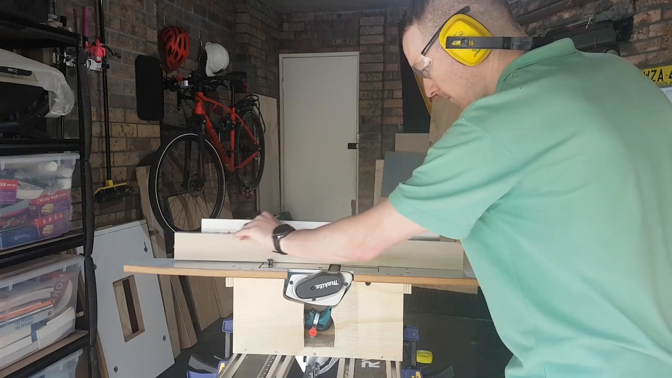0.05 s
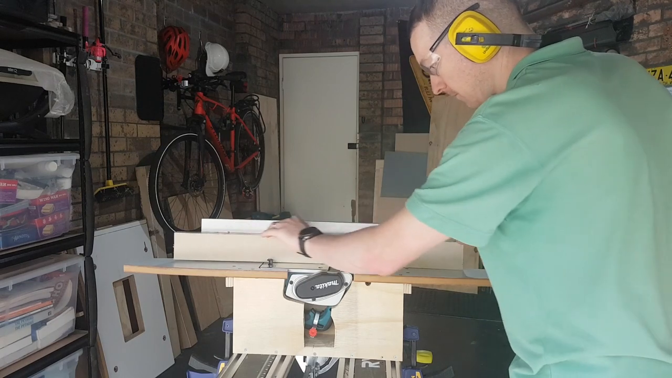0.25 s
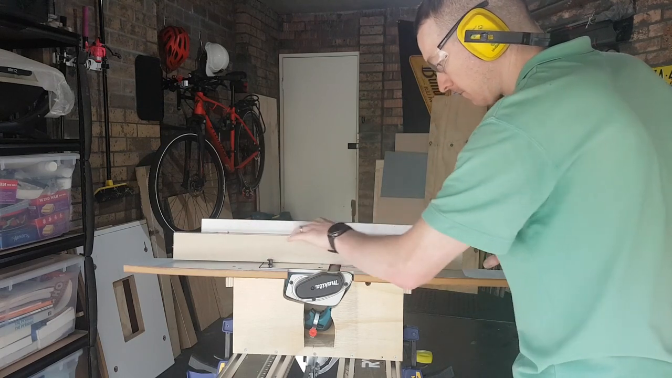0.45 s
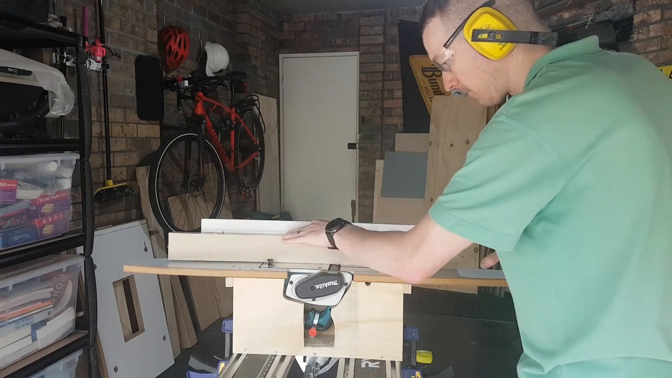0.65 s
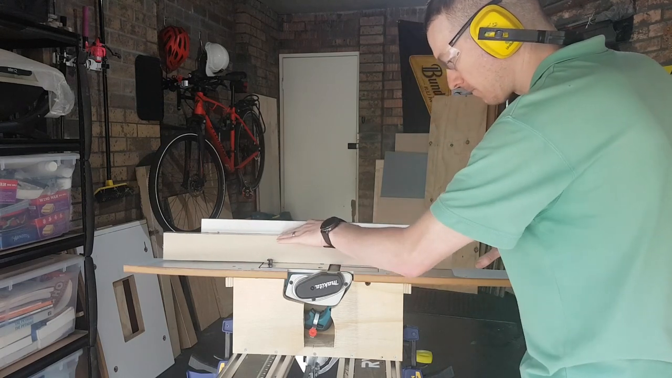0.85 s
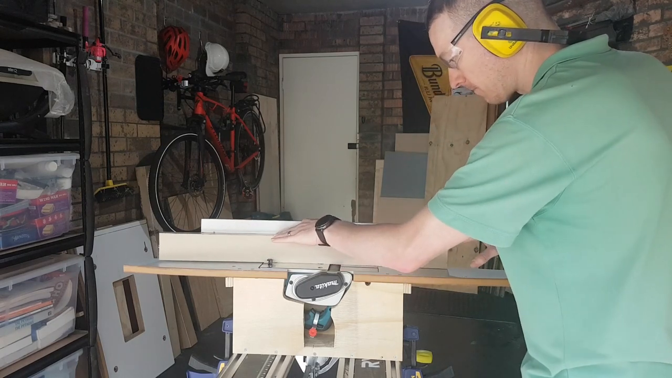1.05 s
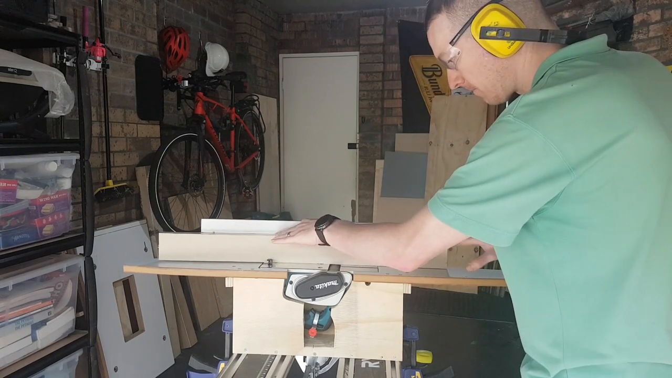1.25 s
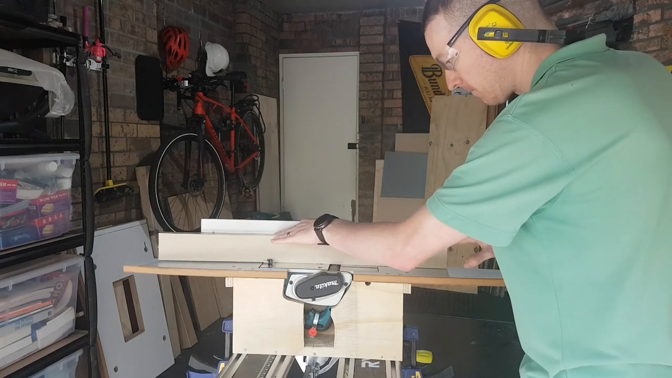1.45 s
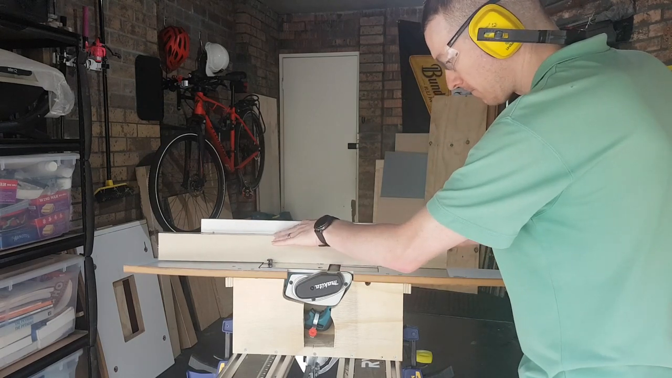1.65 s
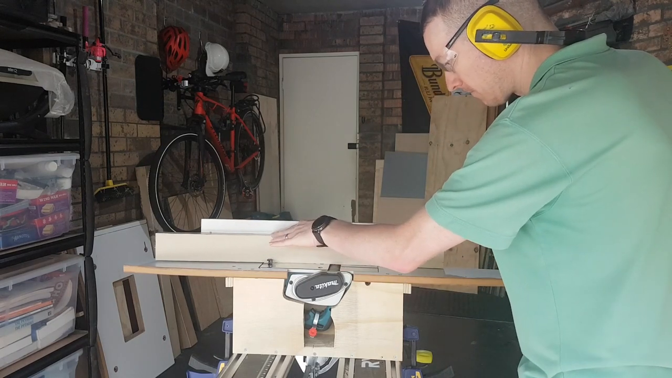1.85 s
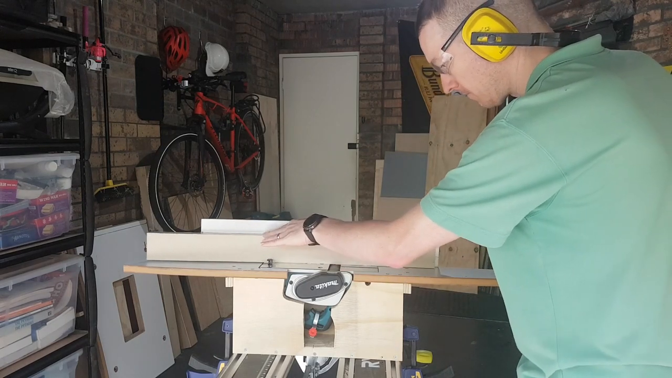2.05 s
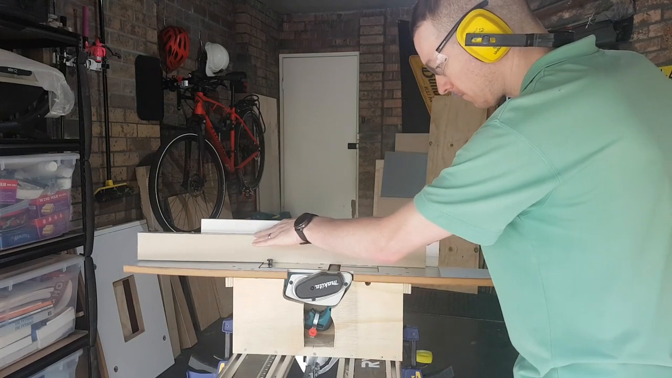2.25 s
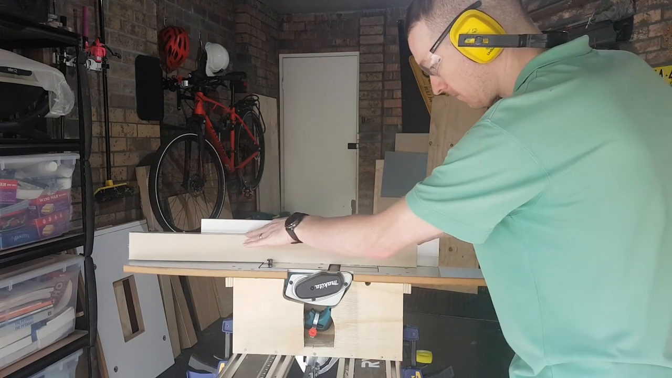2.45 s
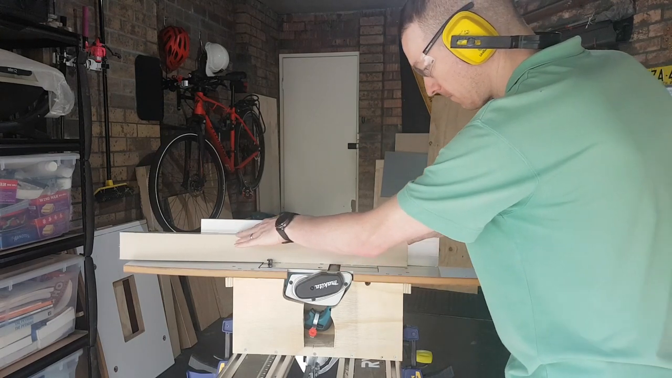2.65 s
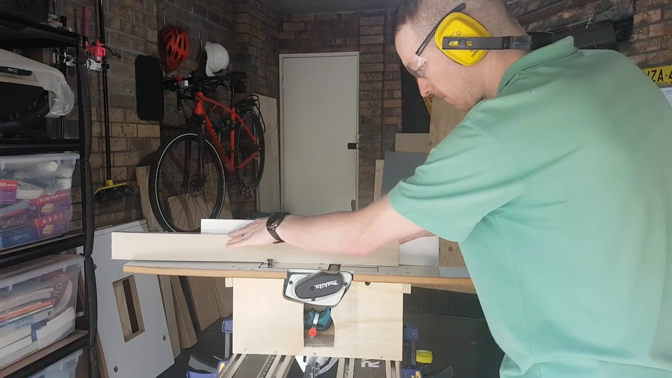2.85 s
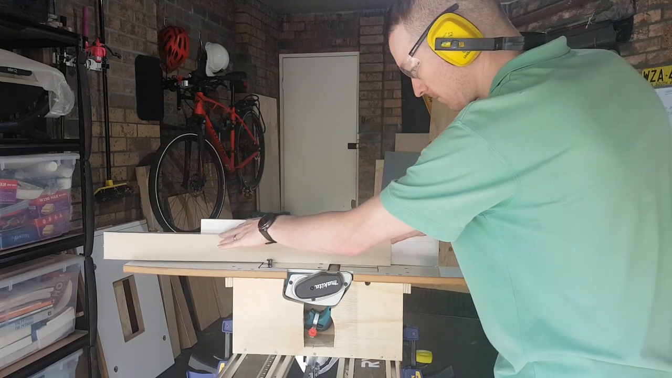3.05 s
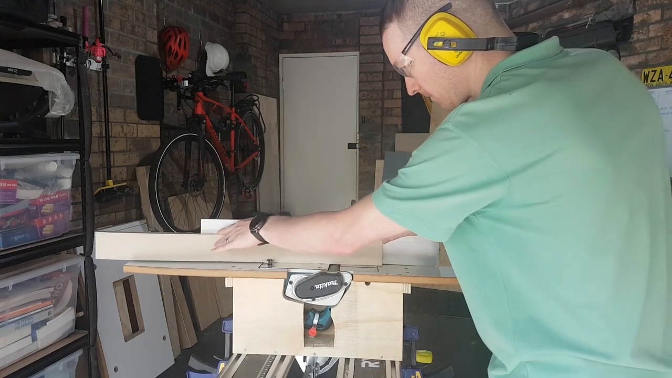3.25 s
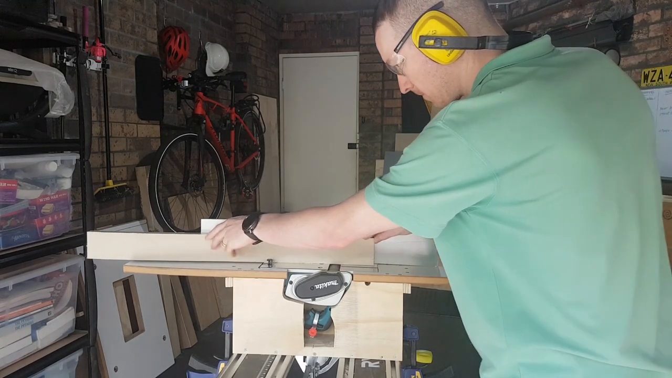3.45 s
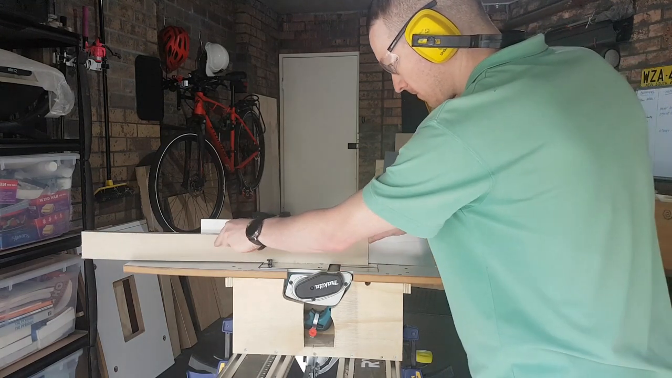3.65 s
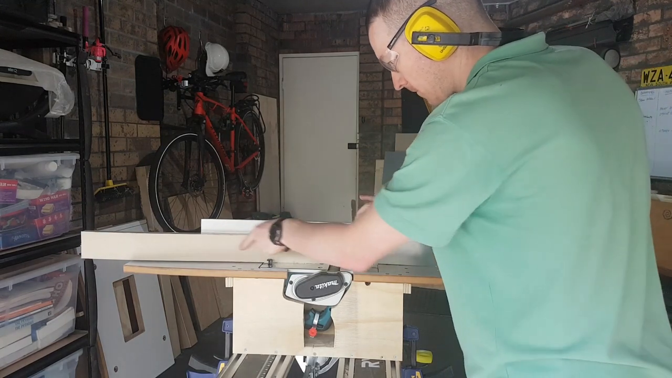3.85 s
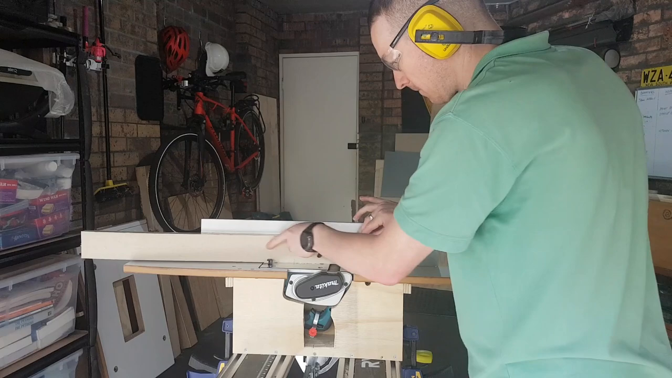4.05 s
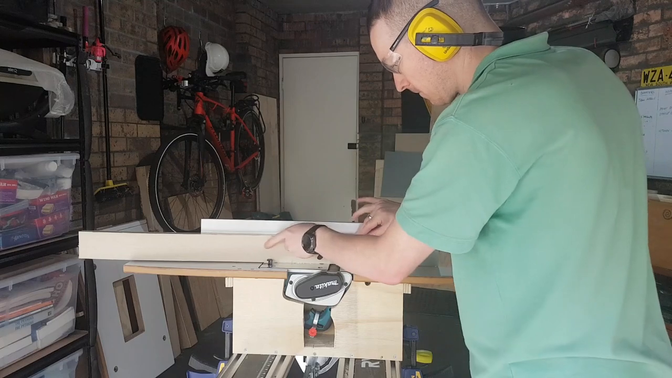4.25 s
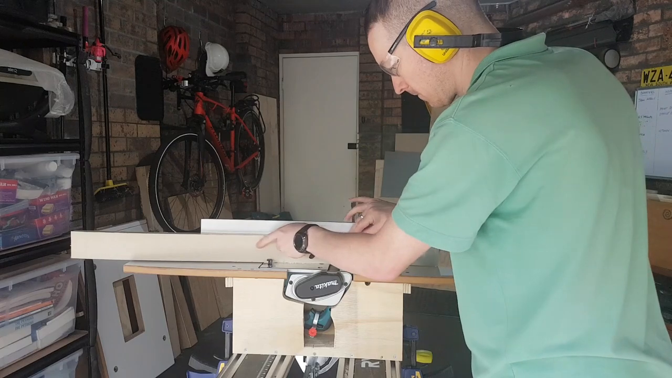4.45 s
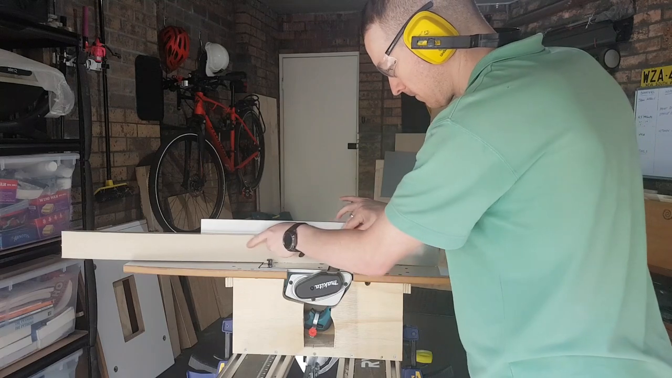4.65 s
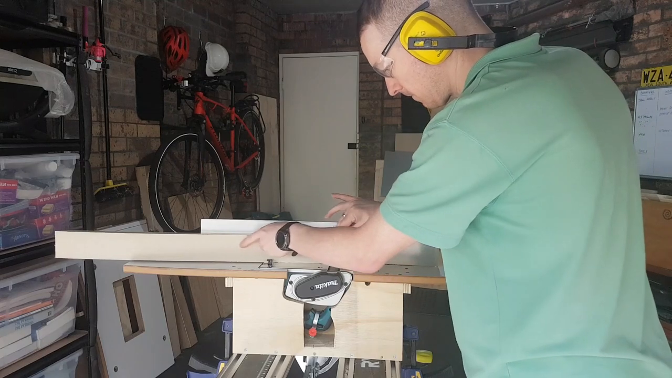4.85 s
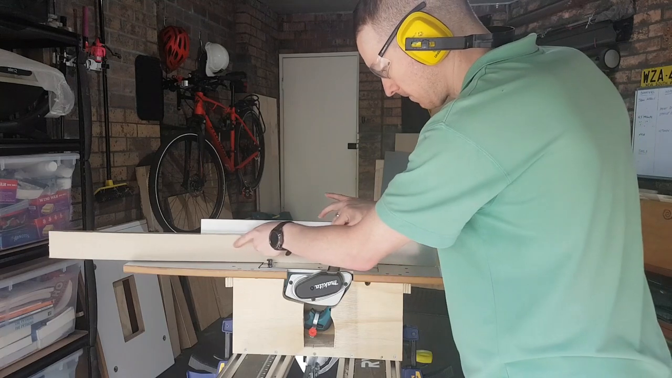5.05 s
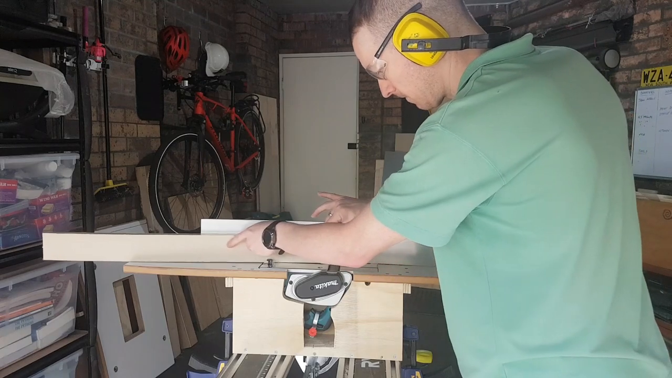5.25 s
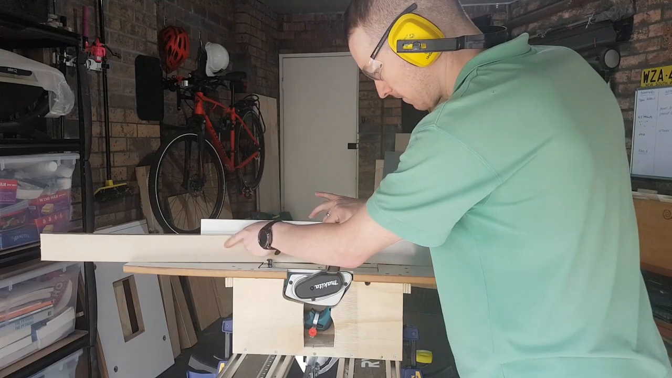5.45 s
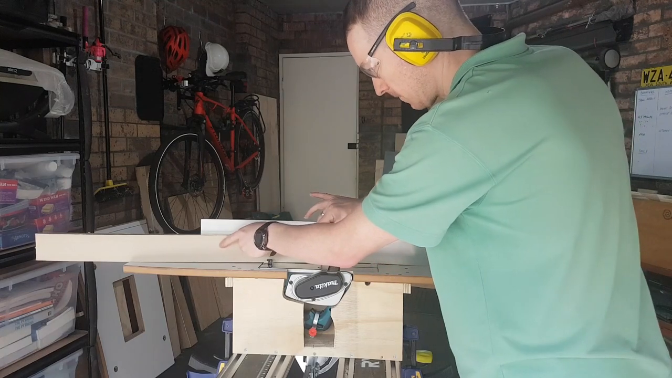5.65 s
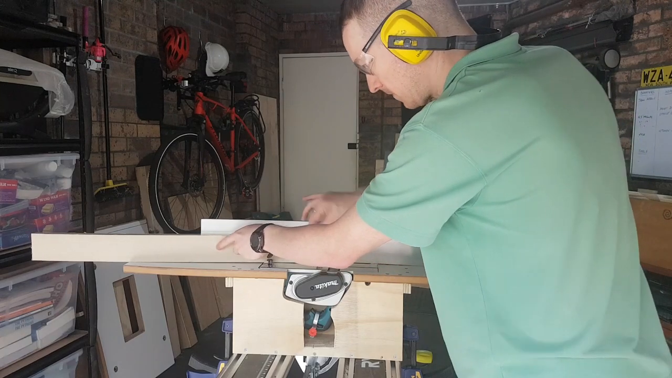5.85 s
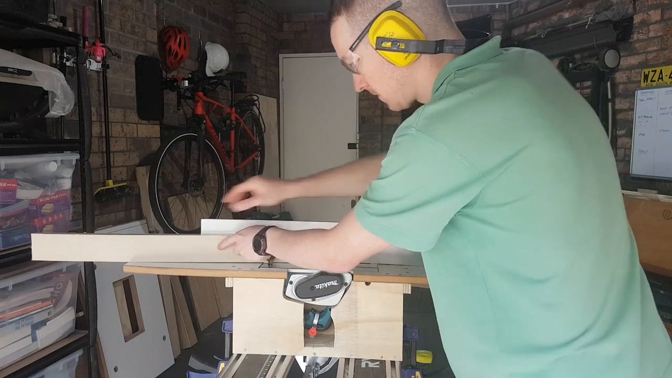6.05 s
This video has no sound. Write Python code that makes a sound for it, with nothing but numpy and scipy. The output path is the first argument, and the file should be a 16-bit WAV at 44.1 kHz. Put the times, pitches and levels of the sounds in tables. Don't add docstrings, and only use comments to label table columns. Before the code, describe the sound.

An upturned cordless planer whines at a steady mid pitch, its buzzing, hissing bite on a sliding wooden board ending as it spins freely.

```python
import sys
import numpy as np
from scipy import signal
from scipy.fft import rfft, irfft, next_fast_len
from scipy.io import wavfile
from scipy.ndimage import uniform_filter1d, map_coordinates

SR = 44100
rng = np.random.default_rng(int(sys.argv[2]) if len(sys.argv) > 2 else 0)


def int16_out(signal):
    q = np.round(np.clip(np.atleast_2d(signal).T, -1, 1) * 32767)
    wavfile.write(sys.argv[1], SR, q.astype(np.int16))


def voltage_ratio(decibels):
    exponent = np.asarray(decibels, float) / 20
    return 10 ** exponent


N = 269451
STEP = 128
EDGE_S, QUICK_EDGE_S = .06, .02
FREE_HZ = 419.4
LIFT_S = 5.2


def along(points, at):
    position, value = np.transpose(points)
    return np.interp(np.log(at + 1e-3), np.log(position), value)


def curves(rows, t):
    s, *columns = np.transpose(rows)
    return [np.interp(t, s, column) for column in columns]


def wobble(rate_hz, t):
    return map_coordinates(rng.standard_normal(200), [t * np.clip(rate_hz, .1, 30)])


def fading(depth, rate_hz, t):
    second_path = depth * (wobble(rate_hz, t) + 1j * wobble(rate_hz, t))
    mean_gain = np.sqrt(1 + 2 * depth ** 2)
    return 20 * np.log10(np.abs(1 + second_path) / mean_gain + 0.0046)


def boosts(rows, hz, reach_hz, t, edge_s=EDGE_S):
    start, length, centre_hz, boost_db = np.transpose(rows)[..., None]
    swell = np.clip(np.minimum(t - start, start + length - t) / edge_s + .5, 0, 1)
    in_reach = np.abs(hz - centre_hz) < reach_hz
    return np.sum(boost_db * swell * in_reach, axis=0)


def fine(slow, wrap=np.inf):
    ramp = np.arange(STEP, dtype=np.float32) / STEP
    start = np.fmod(slow[:-1], wrap).astype(np.float32)
    rise = np.diff(slow).astype(np.float32)
    return (start[:, None] + np.outer(rise, ramp)).ravel()[:N]


def tone(turns, db, blur_rad, t, scatter=1):
    phase = 2 * np.pi * (turns + scatter * rng.random()) + blur_rad * wobble(25, t)
    return fine(np.sqrt(2) * voltage_ratio(db)) * np.sin(fine(phase, wrap=2 * np.pi))


def noise(spectrum):
    hz, _, z = signal.stft(rng.standard_normal(N + 1024), SR, nperseg=1024)
    patches = uniform_filter1d(rng.standard_normal(z.shape), 6, 0)
    patches = uniform_filter1d(patches, 6, 1)
    gain_db = along(spectrum, hz)[:, None] + 1.3 * patches / patches.std()
    x = signal.istft(z * voltage_ratio(gain_db), nperseg=1024)[1][:N]
    return x / x.std()


def contact_db(t):
    return -400 * np.clip(t - LIFT_S, 0, 1)


# t/s, knife rate f/Hz
SPEED = [(0.0, 410.7), (0.1, 413.4), (0.43, 417.2), (0.55, 416.1), (0.71, 408.5), (1.04, 405.2),
         (1.26, 411.8), (1.87, 416.0), (1.92, 409.8), (2.25, 404.4), (3.71, 405.4), (3.76, 408.8),
         (4.17, 415.1), (4.39, 407.5), (4.63, 404.2), (4.91, 406.3), (5.35, 419.1), (6.11, 420.2)]


def speed(t):
    inertia_s = .15
    return uniform_filter1d(curves(SPEED, t)[0], round(inertia_s * SR / STEP), mode="nearest")


def workshop(x, wet_db, t60_s):
    t = np.arange(SR // 3) / SR
    bright = np.diff(rng.standard_normal(len(t) + 1))
    tail = bright * voltage_ratio(-60 * t / t60_s) * (t > .004)
    return x + voltage_ratio(wet_db) * signal.fftconvolve(x, tail / np.linalg.norm(tail))[:N]


# f/Hz, density/dB per Hz
RUSH = [(25, -55), (60, -41), (105, -16), (150, -18.5), (300, -12.5), (500, -1.5), (1000, -4), (1600, -6.5),
        (2200, -8), (3200, -11.5), (5000, -15.5), (8000, -23.5), (11000, -27), (15600, -36.5)]


def fan_rush():
    return voltage_ratio(-46.0) * noise(RUSH)


# t/s, bite depth/dB, sole plate ring/dB, fibre tearing/dB
CUT = [(0, -11.5, -2.5, -12), (.14, -5.5, -2, 2), (.28, -18, -4, -12), (.45, -12.5, -1, -7),
       (.6, 2, -1.5, 6), (.95, 4, 1.5, -6), (1.15, -2, -6, -22), (1.5, -1, -2.5, -18.5),
       (1.76, -9, -13, -32), (1.81, -1, 5.5, -6), (1.96, 2.5, -1, 4), (2.6, 3, -1, -3), (3.64, -2, 3.5, 0),
       (3.8, -9, 2.5, -5), (4.1, -6.5, -3.5, -8), (4.35, -1, 5, 0), (5.1, 3, 6.5, 1), (5.17, -18, -12, -22)]
# f/Hz, density/dB per Hz
CHIP_COLOUR = [(150, -59), (300, -28), (600, -6), (1500, -6), (3000, 0.5), (5000, 3), (6500, -7),
               (8300, 8.5), (10000, -13), (15600, -21)]
# f/Hz, density/dB per Hz
SPLINTER_COLOUR = [(3000, -30), (6500, -8), (8300, 0), (10000, -12), (15600, -26)]
# centre t/s, half length/s, rms level/dB
KNOTS = [
    (0.043, 0.022, -52),
    (.68, 0.041, -50),
    (3.383, .009, -44),
    (4.3, 0.043, -56),
    (5.108, 0.012, -44),
]


def chips(turns, chatter, t):
    tearing_db = curves(CUT, t)[-1]
    chip_db = -54 + tearing_db + 1.2 * chatter - 200 * np.clip(t - 5.15, 0, 1)
    bursts = sum(voltage_ratio(db) * np.exp(-((t - s) / half_s) ** 2) for s, half_s, db in KNOTS)
    passes = fine(turns)
    handful = voltage_ratio(3 * rng.standard_normal(3000))
    puffs = np.exp(1.5 * np.cos(2 * np.pi * passes)) * handful[np.round(passes).astype(int)]
    puffs /= np.sqrt(np.mean(puffs ** 2) / 1.3)
    return puffs * (fine(voltage_ratio(chip_db)) * noise(CHIP_COLOUR) + fine(bursts) * noise(SPLINTER_COLOUR))


SHAFT_ORDERS = [1, 1.54, 1.8, 2.428, 3.54, 6.61, 7, 10.53, 11, 13, 13.47, 14, 15.54, 16, 17, 18, 19, 20, 21,
                22, 23, 24, 25, 28, 29, 30, 31, 36, 38, 42]
SHAFT_DB = [-68, -59.5, -59.5, -52.5, -59, -62, -55.5, -69, -60, -60, -58, -70, -72, -59, -64, -65, -62,
            -71, -75, -73, -76, -64, -72, -66, -68, -60, -74, -73, -75, -81]
# start t/s, length/s, f/Hz, boost/dB
SHADING = [(0.5, 0.24, 410, -3.5), (1.3, 0.63, 410, 2.5), (4, 0.42, 410, -1.5), (5, 0.19, 410, -5.5),
           (0.5, 0.031, 710, 4), (2.5, 0.33, 710, -2.5), (1.45, 0.34, 710, -4.5), (3.5, 0.72, 710, -3),
           (4.5, 0.61, 710, -2), (0.5, 0.38, 825, -4), (1.2, 0.22, 825, -10), (1.8, 0.24, 825, 2.5),
           (2.5, 0.39, 825, -11.5), (4, 0.49, 825, 3.5), (5, 0.23, 825, -3.5), (5.75, .36, 825, -3.5),
           (2.5, 0.082, 1235, -1), (4, 0.088, 1235, -12), (0, 0.41, 1235, -3.5), (5.15, 0.24, 1235, -6.5),
           (0.1, 0.17, 3360, 3.5), (0.5, .3, 3360, -3), (1, 0.58, 3360, 4.5), (2, 0.3, 3360, -6),
           (3.5, 0.35, 3360, -8), (3.5, 0.22, 3360, 3), (4, 0.7, 3360, -8.5), (5.5, 0.073, 3360, -7),
           (3.08, 0.28, 3360, -6)]
# start t/s, length/s, f/Hz, boost/dB
ABRUPT_SHIFTS = [(0, 0.043, 3360, -12), (0.0, 0.089, 410, -5), (0.12, 0.38, 830, -4.5), (0.32, 0.05, 710, 3),
                 (0.4, 0.03, 3360, -14.0), (0.46, 0.26, 410, 4.0), (0.6, 0.4, 820, 4.0), (0.76, 0.08, 1220, 4.0),
                 (0.84, 0.08, 710, 3), (0.9, 0.071, 3360, 4), (1.34, 0.43, 3360, -2.5), (1.46, 0.086, 410, -4.0),
                 (1.64, 0.28, 830, -4.0), (1.74, 0.26, 1240, -2.5), (1.76, 0.05, 3360, 5.5), (1.88, 0.12, 3360, -1),
                 (2.02, 0.03, 3360, 11), (2.22, 0.27, 710, -3), (2.26, 0.26, 810, -9.0), (2.56, 0.41, 710, 2.5),
                 (2.7, 0.18, 810, 9.5), (3.26, 0.4, 810, 2.5), (3.32, 0.69, 1220, -2), (3.5, 0.37, 710, 2.5),
                 (3.56, 0.26, 3360, 4.5), (3.72, 0.08, 1220, -14.0), (3.76, 0.028, 710, 4.5), (3.8, 0.19, 410, -2.5),
                 (3.86, 0.12, 710, -3), (3.94, 0.26, 3360, 5.5), (3.98, 0.12, 1240, 8.5), (3.98, 0.18, 830, -2),
                 (4.26, 0.2, 710, -3.5), (4.56, 0.12, 710, -2.5), (4.6, 0.24, 1210, 2), (4.78, 0.27, 3360, -6.0),
                 (4.98, 0.18, 710, -3.5), (5.0, 0.18, 820, 6.0), (5.62, 0.12, 840, -3), (5.98, 0.18, 710, 3.5)]
# start t/s, length/s, f/Hz, boost/dB
CHUTE = [
    (.25, 0.05, 3360, -10),
    (1.21, 0.044, 3360, -9),
    (1.86, 0.12, 3360, 4),
    (4.903, 0.244, 3360, 3),
    (5.255, .045, 3360, -12),
    (5.45, 0.26, 3360, 1.5),
    (0.73, 0.28, 825, 3),
    (4.125, 0.17, 1235, 3.5),
]


def motor(turns, knife_turns, t):
    bearing, blades = 2.538, 12
    sag_hz = FREE_HZ - speed(t)
    bearing_db = -42 + 0.22 * sag_hz + 0.92 * wobble(14, t)
    bearing_db += boosts(SHADING, 710, 50, t) + boosts(ABRUPT_SHIFTS, 710, 50, t, QUICK_EDGE_S)
    blade_db = -45.5 + 0.01 * sag_hz + fading(.15, 14, t)
    blade_db += boosts(SHADING, 3360, 200, t) + boosts(ABRUPT_SHIFTS + CHUTE, 3360, 200, t, QUICK_EDGE_S)
    out = tone(bearing * turns, bearing_db, 0.054, t)
    out += tone(blades * turns, blade_db, .12, t)
    out += tone(.41 * turns, -75 + fading(0.32, 12, t), 0.64, t)
    shake = .5 * np.cos(2 * np.pi * fine(bearing * turns, wrap=1))
    shake += .17 * np.cos(2 * np.pi * fine(knife_turns, wrap=1))
    for order, db in zip(SHAFT_ORDERS, SHAFT_DB):
        damping_db = .4 * sag_hz * (order in (7, 16, 19, 30))
        level_db = db - damping_db + fading(.4, 7, t)
        out += tone(order * turns, level_db, .15, t) * (1 + shake * (order > 6))
    return out


# knife rate f/Hz, rms level/dB of 1st, 2nd, 3rd tone
BENCH = [(405, -37.5, -49.5, -41), (405.8, -38.5, -45, -44.5), (408.6, -40.5, -41.5, -44.5),
         (409, -40.5, -45, -45.5), (416, -39.5, -45, -43.5), (416.3, -42.5, -42.5, -46.5),
         (413.6, -42, -42, -43)]


def drum(turns, t):
    rate_hz = speed(t)
    out = np.zeros(N)
    for k, db in enumerate(curves(BENCH, rate_hz), 1):
        shift_db = boosts(SHADING + CHUTE, k * rate_hz, 70, t) + boosts(ABRUPT_SHIFTS, k * rate_hz, 70, t, QUICK_EDGE_S)
        out += tone(k * turns, db + shift_db + 0.67 * wobble(12, t), 0.033, t)
    return out


# f/Hz, rms level/dB
PROUD = [(200, -52), (600, -53), (1000, -78), (1400, -60.5), (2230, -58), (2630, -80), (3040, -70),
         (3440, -68), (4460, -63), (5500, -66), (7000, -68), (8300, -57), (9800, -69), (15000, -84)]
# start t/s, length/s, f/Hz, boost/dB
LEANING = [
    (1.95, .6, 610, -8),
    (4.2, .8, 610, 5.5),
]


def proud_knife(turns, t):
    rate_hz = speed(t)
    mismatch_db = np.maximum(-19 + 1.13 * (FREE_HZ - rate_hz), -11)
    out = np.zeros(N)
    for k in np.arange(38) + .5:
        db = along(PROUD, k * rate_hz) + mismatch_db + fading(min(0.25 * k, .5), 7, t)
        db += boosts(LEANING, k * rate_hz, 90, t) + contact_db(t) * (k > 3)
        out += tone(k * turns, db, 0.041 * k, t)
    return out


# knife order, rms level/dB
STRIKE = [(4.0, -49.0), (5.0, -48.0), (6.0, -48.0), (7.0, -50.0), (8.0, -47.0), (9.0, -46.0), (10.0, -50.0),
          (11.0, -56.0), (12.0, -50.0), (13.0, -56.0), (14.0, -54.0), (15.0, -61.0), (16.0, -57.0),
          (17.0, -60.0), (18.0, -56.0), (19.0, -54.0), (20.0, -51.0), (21.0, -53.0), (22.0, -55.0),
          (23.0, -60.0), (24.0, -60.0), (25.0, -61.0), (26.0, -64.0), (27.0, -69.0), (28.0, -67.0),
          (29.0, -67.0), (30.0, -67.0), (31.0, -68.0), (32.0, -66.0), (33.0, -69.0), (34.0, -70.0),
          (35.0, -72.0), (36.0, -74.0), (37.0, -75.0)]
# knife order, rms level/dB
SIREN = [(4, -59), (5, -51), (6, -60), (7, -72), (8, -63), (9, -58), (10, -63), (11, -75), (17, -72)]
BITE_ORDERS = [5.5, 11, 19.5, 30]
BITE_GROWS = [1.27, 1.1, 0.07, 1.13]
RING_GROWS = [0.05, 0.1, 0.96, 0.076]
# centre t/s, half length/s, depth change/dB, ring change/dB
ROCKS = [(0.044, 0.018, 2, 6), (.68, .03, 1, 4), (1.765, .02, -6, -4), (1.797, .02, -6, 8),
         (1.917, 0.051, 2, 0.5), (2.2, 0.094, -0.5, 1), (3.368, .008, -1, -9), (3.73, .04, -2, -1),
         (3.87, 0.065, 3.5, 3), (4.22, .04, 2, 2), (4.335, 0.01, -5, -2), (4.402, 0.01, -3, -1),
         (4.453, 0.05, -1, 0.5), (5.1, 0.014, 0, 4), (5.16, 0.033, 3, 6)]
# t/s, level/dB
CRISP = [(0.03, 5), (.08, 1), (.95, 3), (1.1, 2), (1.45, -1), (1.8, 0), (2.2, 3), (2.35, -1), (2.6, -2),
         (2.85, 4), (3.2, 5), (3.95, 3), (4.1, -2), (4.4, 4.5), (4.85, 1), (4.97, -6), (5.075, -4),
         (5.11, 6), (5.3, 0)]
# start t/s,
# length/s, f/Hz, boost/dB
SINGING = [(0, 0.2, 8670, 11.5), (.26, 0.42, 6230, 9.5), (.65, 0.22, 2040, -10), (.68, 0.2, 8160, -16),
           (.72, 0.15, 1630, 4.5), (.81, 0.13, 3660, -14), (.95, 0.83, 2050, -28), (.95, 0.39, 8140, -20),
           (1.1, 0.8, 3720, -9), (1.8, 0.26, 2060, -10), (1.96, 0.15, 2450, -16), (2.08, 0.46, 8490, 13),
           (2.25, 0.38, 7680, -12), (2.27, 0.58, 4850, 8.5), (2.37, 0.54, 4050, -16),
           (2.43, 0.4, 2020, 5.5), (2.6, 0.59, 1620, -3.5), (2.7, .27, 7700, -11), (2.9, 0.35, 2430, 6),
           (3.01, 0.73, 3640, 8.5), (3.03, 0.2, 8090, 4.5), (3.11, 0.14, 3240, -20), (3.41, .24, 8910, -8),
           (3.8, 0.46, 2070, -8), (4.18, 0.17, 8240, 10.5), (4.57, 0.31, 6080, -12),
           (4.59, 0.38, 9710, -18), (4.61, 0.38, 8130, -21), (4.86, 0.28, 7350, 14), (4.9, .24, 7790, 12),
           (0.0, 0.66, 2910, 7), (0.3, 0.68, 3710, -4.5), (0.84, 0.35, 3250, 3.5), (0.96, 0.16, 2440, -8),
            (1.24, 0.69, 2900, 4.5), (1.46, 0.78, 7890, -11), (1.76, 0.73, 3250, -4),
            (1.918, 0.074, 3280, 6), (2.02, 0.7, 2830, -5), (2.197, 0.08, 8500, 6), (2.24, 0.32, 2430, -4),
            (2.4, 0.6, 5670, 5), (2.68, 0.34, 9310, 8.5), (2.698, 0.13, 2430, 7), (2.76, 0.63, 8500, -1),
            (3.02, 0.4, 3240, 5), (3.04, 0.12, 7690, -16), (3.24, 0.4, 4860, 4), (3.34, 0.074, 8100, 12),
            (3.78, 0.63, 5800, -8), (3.98, 0.68, 3280, -8), (4.08, 0.61, 2860, -4.5),
            (4.462, 0.6, 4050, 4.5), (4.48, 0.39, 7280, 3), (4.68, 0.7, 4910, -4.5), (4.74, 0.28, 5690, 7),
            (4.778, 0.7, 1650, -5.5), (4.88, 0.22, 8580, -8), (4.9, 0.13, 2040, -12), (5.04, 0.7, 7960, -2)]
# start t/s,
# length/s, f/Hz, boost/dB
FLARES = [(0.0, 0.41, 2070, -7), (0, 0.4, 3310, 6.0), (0.36, 0.55, 4110, -2), (0.68, 0.18, 4490, -9.0),
          (0.74, 0.44, 2840, -2), (0.98, 0.03, 1620, -14.0), (1.08, 0.6, 4540, -6.0), (1.14, 0.24, 5350, 7),
          (1.16, 0.08, 3280, -14.0), (1.46, 0.39, 1660, -4.0), (1.56, 0.4, 5400, 8), (1.68, 0.6, 3680, -2),
          (1.9, 0.12, 4920, -6.0), (1.96, 0.08, 4490, -14.0), (2.02, 0.43, 5670, -6.0),
          (2.06, 0.08, 4880, 5), (2.06, 0.12, 2030, -5), (2.06, 0.4, 5260, -6.0), (2.26, 0.18, 3240, -4.0),
          (2.28, 0.08, 4040, -9.0), (2.36, 0.12, 4450, -9.0), (2.38, 0.19, 4850, 2), (2.68, 0.18, 3240, 4.0),
          (2.74, 0.08, 2020, -4.5), (2.9, 0.11, 2020, -3), (2.92, 0.26, 4860, -6.0), (3.06, 0.65, 4050, 3.5),
          (3.08, 0.08, 2020, 4.0), (3.1, 0.26, 5670, -9.0), (3.24, 0.05, 3650, -3), (3.4, 0.05, 3650, 4.0),
          (3.4, 0.18, 4050, -10), (3.52, 0.26, 2430, -3.5), (3.68, 0.05, 3660, -9.0), (4.24, 0.08, 1650, 7),
          (4.4, 0.4, 3640, -3), (4.42, 0.6, 5260, -4.0), (4.44, 0.18, 2430, -6.0), (4.52, 0.4, 4450, 5.5),
          (4.68, 0.18, 4050, 2.5), (4.8, 0.12, 2840, 4.0), (4.84, 0.071, 3250, 4.0), (4.84, 0.6, 5780, -3),
          (4.98, 0.071, 3280, 5.5), (5.04, 0.65, 3770, -8), (5.06, 0.08, 2470, -11), (5.1, 0.05, 2060, -11),
          (5.1, 0.6, 4190, -7),
          (0.08, 0.6, 8750, -3), (0.28, 0.26, 7500, -9.0), (0.46, 0.16, 7890, 7), (0.74, 0.12, 9780, -14.0),
         (0.74, 0.6, 7710, -3), (0.74, 0.6, 8520, -4.0), (1.24, 0.6, 6620, -9.0), (1.4, 0.49, 9400, -6.0),
         (1.88, 0.6, 8110, -2), (1.94, 0.19, 8570, -2), (1.94, 0.26, 7330, -9.0), (2.2, 0.26, 11320, 10),
         (2.3, 0.05, 8900, -14.0), (2.4, 0.12, 8500, -3), (2.42, 0.18, 8900, 5), (2.46, 0.26, 9710, -9.0),
         (2.5, 0.24, 7280, -9.0), (2.54, 0.17, 8500, 5), (2.6, 0.26, 10120, -14.0),
         (2.78, 0.071, 8100, -14.0), (2.78, 0.35, 8910, -4.0), (3.36, 0.6, 8520, -4),
         (3.44, 0.12, 9320, 10.5), (3.48, 0.12, 7700, 6.0), (3.54, 0.6, 10250, -8), (3.78, 0.6, 7450, -4.0),
         (4.1, 0.63, 8970, -4.0), (4.2, 0.4, 6930, 5), (4.22, 0.18, 7800, 4.5), (4.262, 0.05, 8220, -4.0),
         (4.362, 0.13, 10180, 10), (4.46, 0.6, 6480, 4.0), (4.74, 0.16, 8930, 3.5), (4.74, 0.26, 8120, 9.0),
         (4.94, 0.03, 6520, -14.0), (4.94, 0.05, 7750, -2.5), (4.98, 0.03, 7770, 3),
         (5.0, 0.12, 9030, -9.0), (5.038, 0.03, 7800, -6.0), (5.04, 0.4, 7490, -2.5)]


def knives(turns, chatter, t):
    rate_hz = speed(t)
    depth_db, ring_db, _ = curves(CUT, t)
    centre, half_s, *change_db = np.transpose(ROCKS)[..., None]
    rock_db = np.sum(change_db * np.exp(-((t - centre) / half_s) ** 2), axis=1)
    bite_db = np.outer(BITE_GROWS, depth_db + rock_db[0]) + np.outer(RING_GROWS, ring_db + rock_db[1])
    bite_db[-1] += curves(CRISP, t)[0]
    out = np.zeros(N)
    for k in range(4, 39):
        share = [np.interp(np.log(k), np.log(BITE_ORDERS), row) for row in np.eye(4)]
        wood_db = along(STRIKE, k) + np.dot(share, bite_db) + contact_db(t)
        wood_db += fading(min(.03 + .009 * k, .35) + .3 * (k > 25), 13, t) + min(.05 * k, 1.1) * chatter
        air_db = along(SIREN, k) - 60 * (k > 17) + 1.2 * wobble(3, t)
        mode_db = boosts(SINGING, k * rate_hz, 190, t)
        mode_db += boosts(FLARES, k * rate_hz, 200, t, QUICK_EDGE_S)
        level_db = mode_db + 10 * np.log10(voltage_ratio(2 * wood_db) + voltage_ratio(2 * air_db))
        out += tone(k * turns, level_db, .014 * k, t, scatter=min(14 / k, 1))
    return out * (1 + .065 * map_coordinates(rng.standard_normal(3000), [fine(turns) * .62]))


def scene():
    t = np.arange(0, N + STEP, STEP) / SR
    rate_hz = speed(t)
    belt = 1.470 + .0002 * (rate_hz - 405)
    knife_turns, shaft_turns = np.cumsum([rate_hz, rate_hz / belt], axis=1) * STEP / SR
    chatter = wobble(18, t) + 1.2 * wobble(30, t)
    background = fan_rush() + chips(knife_turns, chatter, t) + motor(shaft_turns, knife_turns, t)
    strikes = knives(knife_turns, chatter, t) + proud_knife(knife_turns, t)
    cutting = workshop(strikes, wet_db=-14, t60_s=.2) + drum(knife_turns, t)
    return (background + cutting)[None]


def top_cut(x):
    return signal.sosfilt(signal.butter(12, 15640, fs=SR, output="sos"), x)


def record(dry):
    top_hz = 15720
    size = next_fast_len(N)
    passed = np.fft.rfftfreq(size, 1 / SR) < top_hz
    limited = irfft(rfft(dry, size) * passed, size)[:, :N]
    return top_cut(limited)


dry = scene()
out = record(dry)
int16_out(out)
```